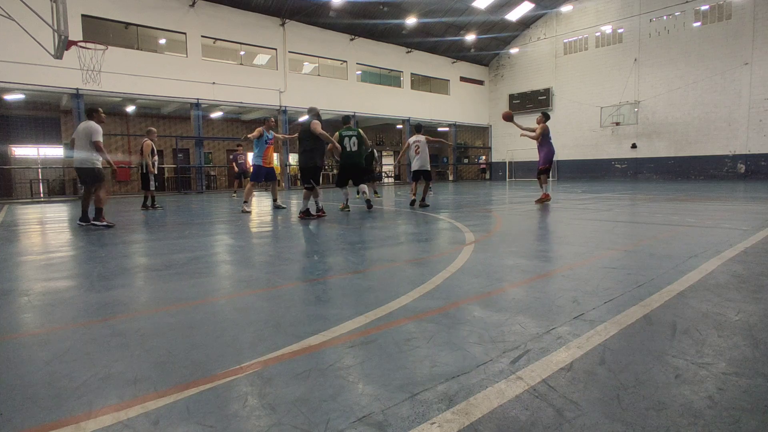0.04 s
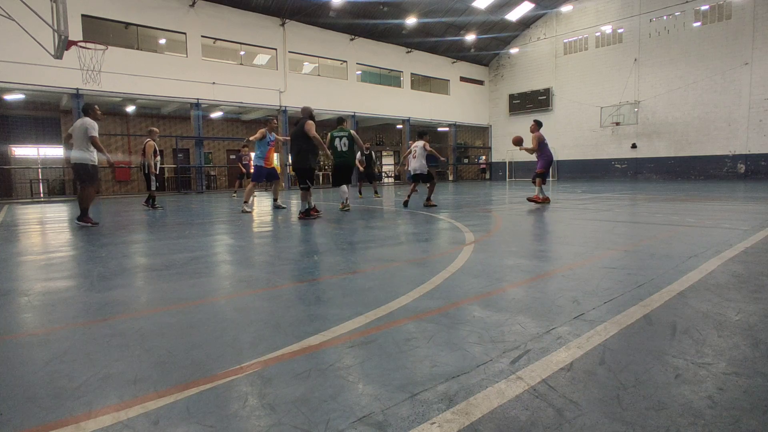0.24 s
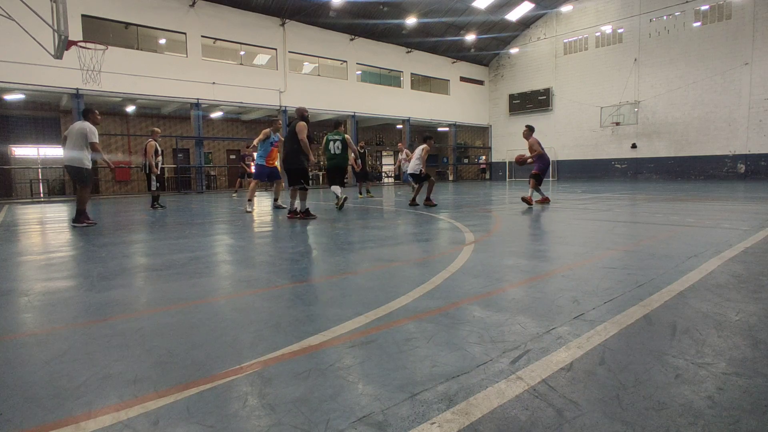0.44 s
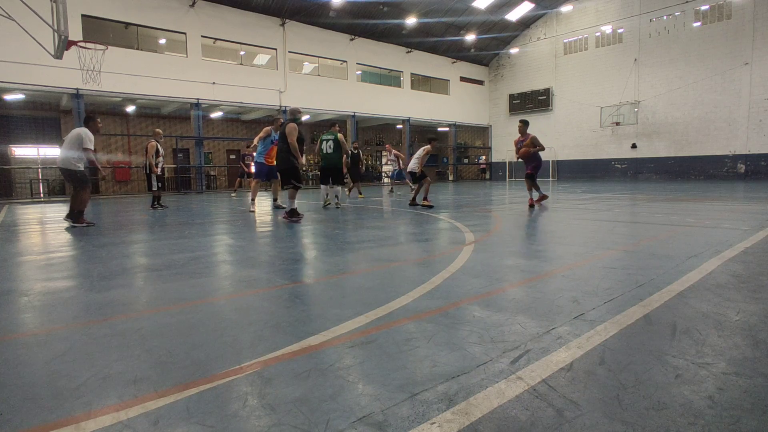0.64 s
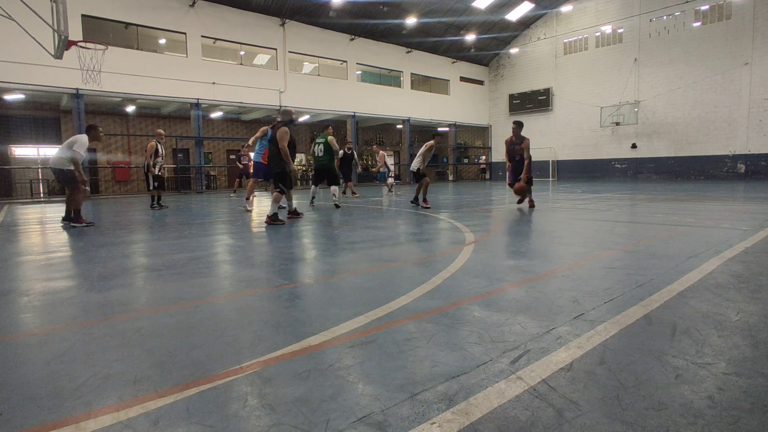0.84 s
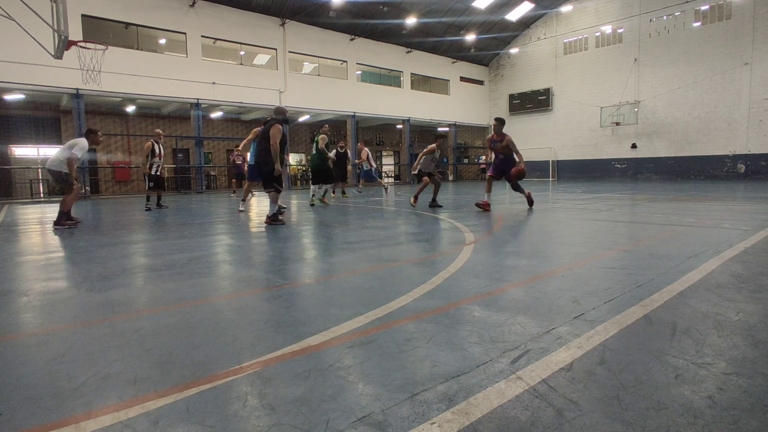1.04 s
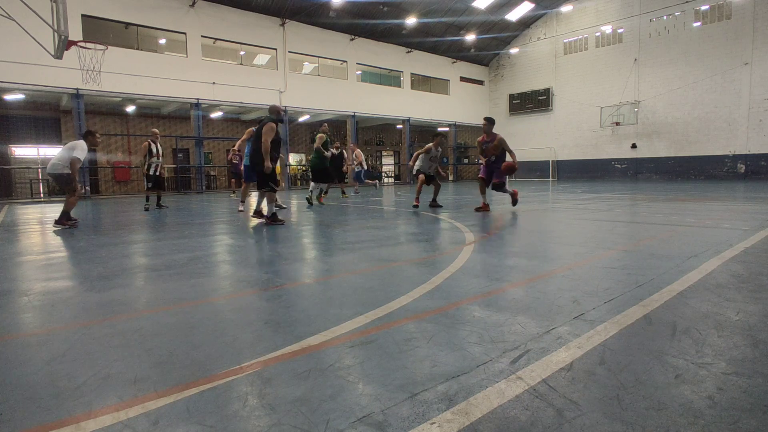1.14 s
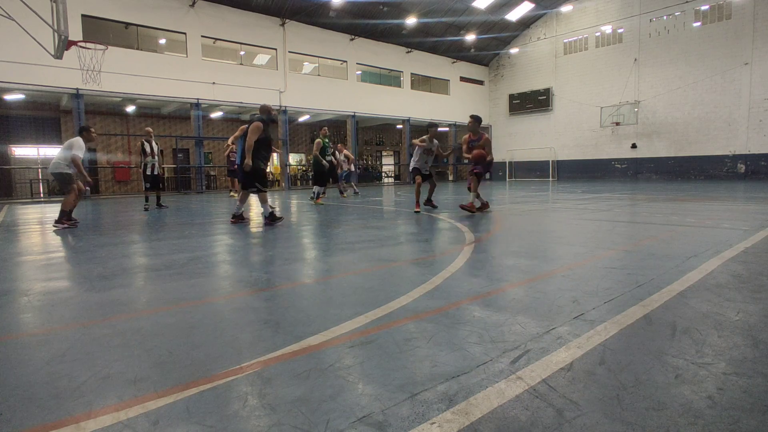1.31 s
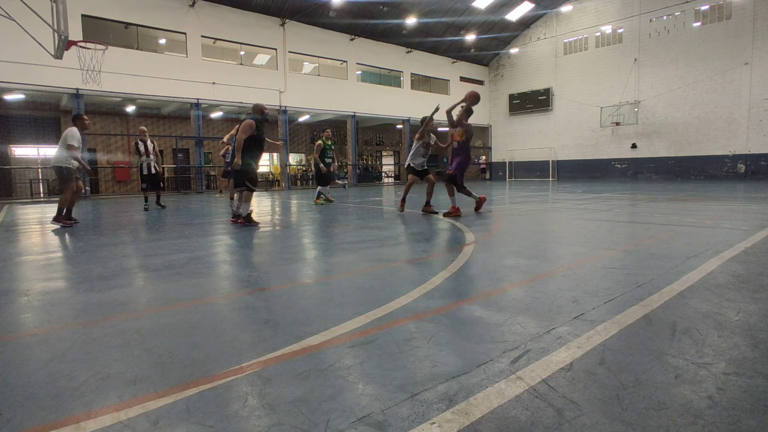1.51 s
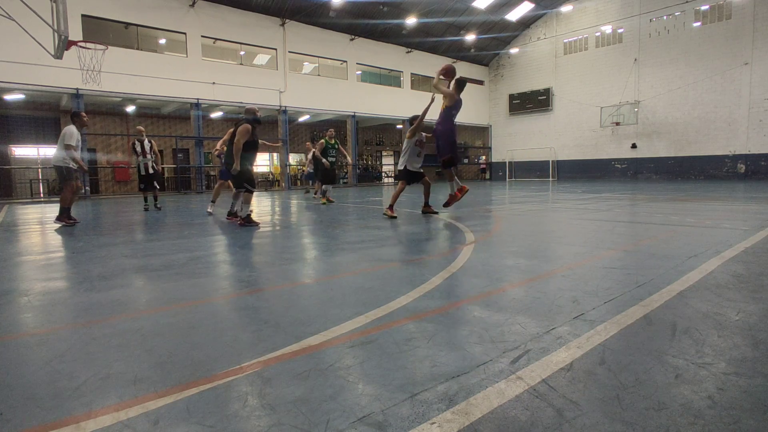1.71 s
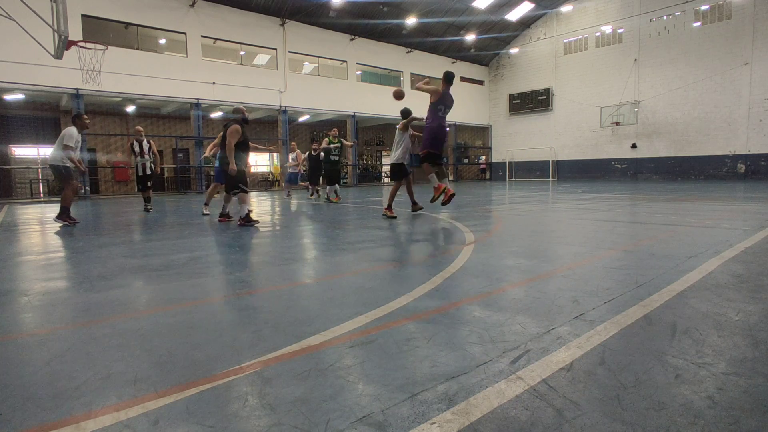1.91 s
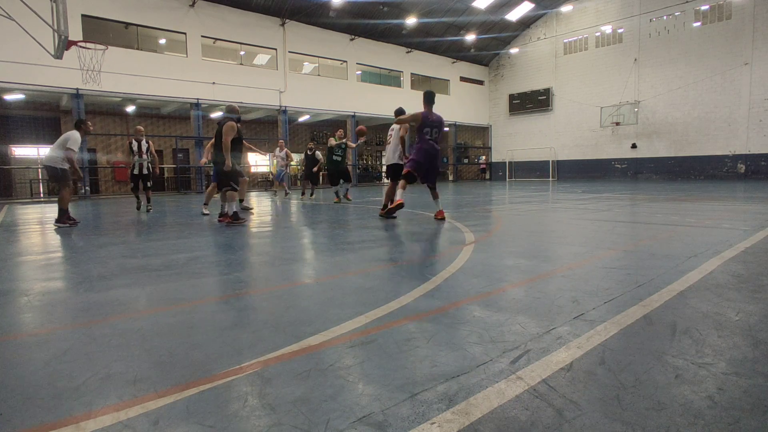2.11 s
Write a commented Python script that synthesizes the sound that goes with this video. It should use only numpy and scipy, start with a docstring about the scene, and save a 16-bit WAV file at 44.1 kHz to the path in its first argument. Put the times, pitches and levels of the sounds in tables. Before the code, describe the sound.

Basketball shoes squeak in short high chirps on a hard gym floor, with one hard ball bounce

```python
"""A big bare sports hall, courtside at basketball.
Shoe soles stick and slip in high gliding chirps; dragged soles judder as strings of tiny falling chirps.
Scuffs and dull footfalls are coloured noise bursts. One hard bounce is two slaps, a push of air and ringing modes.
The hall is decaying noise with a late return from the far walls, and the boom echoes off the end wall.
Underneath lie a steady dull wash and the fading ring of earlier squeaks, both shaped noise."""
import sys
import numpy as np
from scipy import signal
from scipy.fft import rfft, irfft
from scipy.io import wavfile
from scipy.ndimage import uniform_filter1d

SR = 44100
rng = np.random.default_rng(int(sys.argv[2]) if len(sys.argv) > 2 else 0)


def waveform_to_disk(signal):
    """Save audio, clipped to [-1, 1], as 16-bit WAV at the path in sys.argv[1]."""
    frames = np.transpose(np.atleast_2d(signal))
    scaled = np.clip(frames, -1, 1) * 32767
    samples = np.round(scaled).astype(np.int16)
    wavfile.write(sys.argv[1], SR, samples)


N = 94815  # samples

# In every table and setting, a positive left-right dB leans left.
# Murk of the hall, relative spectrum: pitch_hz, level_db (per Hz)
WASH_SPECTRUM = [(15, -55), (25, -12), (65, -6.5), (143, -12), (179, -5.5), (233, -3), (403, -9), (536, -7),
                 (1140, -15.5), (1390, -16), (3200, -23.5), (4160, -52), (7040, -120)]
# Ring left by earlier squeaks, relative spectrum: pitch_hz, level_db (per Hz)
RING_SPECTRUM = [(3200, -24), (3900, -16.5), (4400, -6.5), (4950, 1.5), (5600, -11.5), (6150, -2),
                 (6700, -11), (8000, -21.5), (10000, -17.5), (11000, -28.5), (15000, -42)]
WASH_DB, RING_DB, RING_FALL_DB_PER_S = -43.5, -43.5, 3.5  # rms levels; the ring's is at the start

# Time for the hall to fall 60 dB: pitch_hz, t60_s
HALL_T60 = [(100, 4.3), (250, 5.3), (1000, 4.36), (2500, 6.5), (5000, 2.64), (8500, 1.52), (14000, 0.13)]
# Likeness of left and right in the surrounding sound: pitch_hz, correlation (-1 to 1)
LIKENESS = [(60, 0.95), (130, 0.84), (290, 1), (640, 0.22), (1400, -0.21), (3000, -0.069)]
# Left-right lean of the hall, the wash and the ball: pitch_hz, left_right_db
BALANCE = [(60, 6), (400, 6), (700, 2.5), (1300, 3), (2400, .5), (4600, -2.5), (8500, -0.5), (14000, 2)]
HALL_DB, HALL_BUILD_S = 2.5, 0.086
EARLY_DB, EARLY_START_S, EARLY_DECAY_S = -1.5, 0.0044, 0.017
FAR_WALL_DB, FAR_WALL_START_S, FAR_WALL_DECAY_S = 3, 0.175, 0.28
ECHO_S, ECHO_DB = 0.26, -15  # the boom comes back from the end wall

# Footfalls: start_s, level_db (rms at onset)
STEPS = [(.165, -42), (.313, -41)]
# Footfall colour, relative: pitch_hz, level_db
STEP_COLOUR = [(80, -13), (250, -8.5), (800, -6.5), (1500, -8.5), (3500, -32.5), (10000, -43.5)]
STEP_DECAY_S, STEP_HALL_DB = 0.0095, 3.5

# Shoe scuffs and ticks: start_s, decay_s, level_db (rms at onset)
SCUFFS = [(0.165, 0.011, -47), (.243, 0.0012, -43), (0.314, 0.0082, -52), (1.115, 0.03, -36.5),
          (1.605, 0.0024, -36.5), (1.624, 0.0045, -36), (1.631, 0.0023, -31)]
# Scuff colour, relative: pitch_hz, level_db
SCUFF_COLOUR = [(100, -7), (400, -2.5), (1200, 3), (3000, -6.5), (4500, -13), (8000, 7.5), (11000, -15.5),
                (15000, -27)]

# Juddering skids: start_s, length_s, pitch_hz, pitch_scatter (share), level_db, left_right_db, hall_db
SKIDS = [(0.501, .07, 5544, 0.079, -39, -14, 10), (0.577, .07, 5690, 0.077, -28.5, -8.5, 2)]
JUDDER_HZ, JUDDER_SCATTER = 289.8, 0.37  # catches per second; timing scatter as a share of the gap
CATCH_PEAK_S, CATCH_SAG_PER_S, CATCH_SCATTER_DB = 0.0018, 5.2, 2.5  # sag is a share of the pitch

# Squeaks: start_s, length_s, start_pitch_hz, end_pitch_hz, level_db, roughness (rms share of pitch),
# octave_db (relative to the fundamental), left_right_db, hall_db
SQUEAKS = [ (0.236, .011, 4950, 4585, -22, 0.012, -23, -2.5, -2),
           (0.325, 0.014, 5910, 5586, -31, .02, -34, 18, 7),
           (0.329, 0.017, 4815, 4610, -37, 0.02, -20, 12, 8),
           (0.407, 0.078, 4990, 5170, -39, .035, -2.5, -4, 5),
           (0.453, 0.027, 5440, 5180, -35, 0.022, -30, 1, 2),
           (0.48, 0.009, 7180, 6090, -32, 0.018, -23, -1, 6),
           (0.486, 0.015, 6006, 5480, -24.5, 0.0054, -15, 10, 0),
           (0.592, 0.12, 4600, 4437, -44.5, 0.035, -7, 13, 8),
           (0.691, 0.05, 3650, 3630, -42, 0.025, 4, -7, 3),
           (.694, 0.1, 7180, 9200, -39.5, 0.014, -40.5, 3, -3),
           (.73, 0.05, 3800, 3900, -46, 0.022, 1, 0, 5),
           (0.783, 0.021, 3700, 3620, -37.5, 0.024, -1.5, 0, 4.5),
           (0.909, 0.013, 5680, 5320, -33.5, 0.015, -14, -12, -2),
           (1.02, 0.011, 5940, 6030, -28, 0.0064, -25, -9, 1),
           (1.08, 0.046, 5670, 5480, -40, .012, -15, -25, -1),
           (1.1141, 0.0091, 4920, 4254, -18.5, .04, -7.5, 0, 4.5),
           (1.120, 0.014, 5600, 5040, -26, .08, -22, -5, 7.5),
           (1.124, 0.019, 4124, 4068, -33, 0.035, 2.5, 10, 4.5),
           (1.126, 0.01, 4917, 4600, -27, 0.0503, -4.5, 16, 7),
           (1.148, 0.015, 5900, 5600, -35, 0.025, -30.5, 0, -1),
           (1.615, 0.0099, 5300, 5160, -24, 0.0077, -20, -15, 3),
           (1.631, 0.026, 5270, 5210, -35.5, 0.014, -10, -6, 2.5),
           (1.890, 0.018, 6810, 6880, -38.5, .012, -43, -16.5, 0),
           (2.027, 0.035, 4335, 4434, -53, .03, 0.5, 6, 9.5)]
SQUEAK_ATTACK_S, SQUEAK_RELEASE_S = 0.0017, 0.0043
JITTER_HZ, FLUTTER_HZ, FLUTTER_DB = 746.5, 294, 2.5  # smoothing windows last 1/Hz
THIRD_DB = -26.5  # third harmonic, relative to the octave
FALL_SHAPE, RISE_SHAPE = 0.398, 1.3  # powers of time: falls drop at once and settle, rises gather pace

THUMP_S, THUMP_HZ, THUMP_DB, THUMP_HALL_DB = 1.0178, 194, -18, 3

# Modes of ball and floor: pitch_hz, level_db, t60_s
BALL_MODES = [(80, -36, 0.1), (119.5, -16.5, .13), (159, -19, 0.2), (194, -23.5, 0.13), (232, -11, 0.14),
              (267, -22, 0.025), (332.5, -25, 0.1), (424.5, -19.5, 0.069), (517, -33.5, 0.15),
              (814, -30.5, 0.09), (886, -38, 0.067), (1165, -35, 0.083), (1370, -41, 0.037),
              (1496, -14, 0.015), (1645, -35, 0.14), (2137, -37, 0.1), (2300, -41, 0.065)]
BOUNCE_S, SWELL_CYCLES, BALL_HALL_DB = 1.0096, 2.4, -17.5

# Slaps of the bounce: start_s, level_db (click height before colouring)
SLAPS = [(1.0098, 1.5), (1.0176, 4.5)]
# Slap colour, gain: pitch_hz, level_db
SLAP_COLOUR = [(100, -5), (400, 5.5), (900, -2.5), (1450, 2), (1900, -7), (2300, -3.5), (3000, -16.5),
               (4000, -12.5), (7500, -3), (10000, -22.5), (15000, -33)]
SLAP_HALL_DB, SLAP_PAN_DB = 3, 10

# Microphone response: pitch_hz, level_db
MIC_RESPONSE = [(3000, 0), (9300, -0.5), (10100, -13.5), (11500, -15), (12300, -14), (14000, 3),
                (15700, -12)]
TOP_HZ = 15400


def undb(db):
    """Decibels to gain."""
    return 10 ** (np.asarray(db) / 20)


def unit(x):
    """Scale to rms 1."""
    return x / np.sqrt(np.mean(x ** 2))


def at(points, hz):
    """Read a table on a log-frequency axis."""
    f, v = np.array(points, float).T
    return np.interp(np.log(hz + 1), np.log(f), v)


def bins():
    """Frequencies of the spectrum, in Hz."""
    return np.arange(N // 2 + 1) * SR / N


def pan(db):
    """Left and right gains that differ by db."""
    return undb(np.array([[db], [-db]]) / 2)


def fade(t, decay):
    """Sudden start, exponential fall."""
    return (t >= 0) * np.exp(-np.maximum(t, 0) / decay)


def fall60(t, t60):
    """Exponential fall of 60 dB in t60 seconds."""
    return np.exp(-np.log(1000) * t / t60)


def wander(rate_hz):
    """Smoothed noise of rms 1."""
    return unit(uniform_filter1d(rng.standard_normal(N), int(SR / rate_hz)))


def colour(x, points):
    """Minimum-phase filter: a folded cepstrum gives the wanted response without ringing ahead."""
    cepstrum = irfft(np.log(undb(at(points, bins()))), N)
    fold = np.r_[1, np.full(N // 2, 2), np.zeros(N - 1 - N // 2)]
    return irfft(rfft(x) * np.exp(rfft(cepstrum * fold)), N)


def bursts(envelope, points):
    """Noise bursts of a given colour; the envelope sets their rms."""
    filter_rms = np.sqrt(np.mean(undb(at(points, bins())) ** 2))
    return colour(rng.standard_normal(N) * envelope, points) / filter_rms


def diffuse():
    """Stereo noise spectra of sound from all round: much alike in the bass, little alike in the treble."""
    mid, side = rfft(rng.standard_normal((2, N)))
    likeness = np.clip(at(LIKENESS, bins()), -.99, .99)
    sign = np.array([[1], [-1]])
    stereo = mid * np.sqrt((1 + likeness) / 2) + sign * side * np.sqrt((1 - likeness) / 2)
    return stereo * undb(sign * at(BALANCE, bins()) / 2)


def wash(t):
    """Steady dull murk of the hall below, and the fading ring of earlier squeaks above."""
    treble = bins() > RING_SPECTRUM[0][0]
    murk = unit(irfft(diffuse() * undb(at(WASH_SPECTRUM, bins())) * ~treble, N))
    ring = unit(irfft(diffuse() * undb(at(RING_SPECTRUM, bins())) * treble, N))
    return undb(WASH_DB) * murk + undb(RING_DB - RING_FALL_DB_PER_S * t) * ring


def hall(send, t):
    """Near reflections, a slowly building tail and a late far-wall return; the highest treble dies first."""
    field, tail = diffuse(), 0
    centres = np.geomspace(60, 15000, num=12)  # Hz, overlapping bands that each decay at their own rate
    for k, hz in enumerate(centres):
        share = np.interp(np.log(bins() + 1), np.log(centres), np.arange(len(centres)) == k)
        tail = tail + irfft(field * share, N) * fall60(t, at(HALL_T60, hz))
    build = undb(HALL_DB) ** 2 * 2 * np.pi * (1 - np.exp(-t / HALL_BUILD_S))
    early = undb(EARLY_DB) ** 2 * fade(t - EARLY_START_S, EARLY_DECAY_S) / EARLY_DECAY_S
    far = undb(FAR_WALL_DB) ** 2 * fade(t - FAR_WALL_START_S, FAR_WALL_DECAY_S) / FAR_WALL_DECAY_S
    response = tail * np.sqrt((build + early + far) / SR)
    return signal.fftconvolve(send[None], response, axes=1)[:, :N]


def steps(t):
    """Heels knock dully on the boards: short dark noise bursts."""
    return bursts(sum(undb(db) * fade(t - start, STEP_DECAY_S) for start, db in STEPS), STEP_COLOUR)


def scuffs(t):
    """Soles land and brush the floor: brief noise bursts."""
    return bursts(sum(undb(db) * fade(t - start, decay) for start, decay, db in SCUFFS), SCUFF_COLOUR)


def skids(t):
    """A dragged sole catches and lets go in quick uneven jerks; each is a tiny falling chirp on its own pitch."""
    direct, send = np.zeros((2, N)), np.zeros(N)
    age = t[:SR // 20]
    swell = age / CATCH_PEAK_S * np.exp(1 - age / CATCH_PEAK_S)
    for start, length, hz, scatter, db, pan_db, hall_db in SKIDS:
        tone = np.zeros(N)
        draws = np.clip(rng.standard_normal(size=(40, 3)), -2, 2)
        for k, (late, high, loud) in enumerate(draws):
            if k / JUDDER_HZ < length:
                first = int((start + (k + JUDDER_SCATTER * late) / JUDDER_HZ) * SR)
                turns = hz * (1 + scatter * high) * age * (1 - CATCH_SAG_PER_S * age / 2)
                chirp = swell * np.sin(2 * np.pi * turns)
                tone[first:first + len(age)] += undb(db + CATCH_SCATTER_DB * loud) * chirp
        direct += pan(pan_db) * tone
        send += undb(hall_db) * tone
    return direct, send


def squeaks(t):
    """Each sole sticks and slips thousands of times a second; the pitch glides and jitters, the level flutters."""
    direct, send = np.zeros((2, N)), np.zeros(N)
    for start, length, hz0, hz1, db, rough, octave_db, pan_db, hall_db in SQUEAKS:
        age = t - start
        shape = FALL_SHAPE if hz1 < hz0 else RISE_SHAPE
        glide = hz0 + (hz1 - hz0) * np.clip(age / length, 0, 1) ** shape
        phase = 2 * np.pi * np.cumsum(glide * (1 + rough * wander(JITTER_HZ))) / SR
        attack = np.clip(age / SQUEAK_ATTACK_S, 0, 1) ** 2
        release = np.clip((length - age) / SQUEAK_RELEASE_S, 0, 1)
        flutter = unit(undb(FLUTTER_DB * wander(FLUTTER_HZ)))  # the sole's grip comes and goes
        overtones = np.sin(2 * phase) + undb(THIRD_DB) * np.sin(3 * phase)
        voice = np.sin(phase) + undb(octave_db) * overtones
        tone = undb(db) * attack * release * flutter * voice
        direct += pan(pan_db) * tone
        send += undb(hall_db) * tone
    return direct, send


def thump(t):
    """The ball flattens and springs back: one round push of air with a dip on either side."""
    u = (np.pi * THUMP_HZ * (t - THUMP_S)) ** 2
    return undb(THUMP_DB) * (1 - 2 * u) * np.exp(-u)


def ball(t):
    """Ball and floor boom as decaying modes, each swelling over a few of its own cycles."""
    age = np.maximum(t - BOUNCE_S, 0)
    direct, send = np.zeros((2, N)), np.zeros(N)
    for hz, db, t60 in BALL_MODES:
        swell = np.minimum(age * hz / SWELL_CYCLES, 1)
        mode = undb(db) * swell * fall60(age, t60) * np.sin(2 * np.pi * hz * age)
        direct += pan(at(BALANCE, hz)) * mode
        send += mode
    return direct, send


def slaps(t):
    """The ball's skin cracks on the floor: two coloured clicks in quick succession."""
    clicks = np.zeros(N)
    for start, db in SLAPS:
        clicks[int(start * SR)] += undb(db)
    return colour(clicks, SLAP_COLOUR)


def scene():
    """Shoes and ball, direct and through the hall, with the boom off the end wall and the wash beneath."""
    t = np.arange(N) / SR
    step, scuff, push, slap = steps(t), scuffs(t), thump(t), slaps(t)
    skid, skid_send = skids(t)
    squeak, squeak_send = squeaks(t)
    boom, boom_send = ball(t)
    shoes = squeak + skid + step + scuff
    bounce = boom + pan(SLAP_PAN_DB) * slap + pan(at(BALANCE, THUMP_HZ)) * push
    shoes_send = squeak_send + skid_send + scuff + undb(STEP_HALL_DB) * step
    bounce_send = undb(BALL_HALL_DB) * boom_send + undb(SLAP_HALL_DB) * slap + undb(THUMP_HALL_DB) * push
    echo = undb(ECHO_DB) * ball(t - ECHO_S)[0]
    return shoes + bounce + echo + hall(shoes_send + bounce_send, t) + wash(t)


def record(dry):
    """The microphone shapes the high treble and a steep low-pass cuts the top."""
    top_cut = signal.ellip(8, .2, 70, TOP_HZ, fs=SR, output="sos")  # 0.2 dB ripple, 70 dB stop
    return signal.sosfilt(top_cut, colour(dry, MIC_RESPONSE))


dry = scene()
out = record(dry)
waveform_to_disk(out)
```